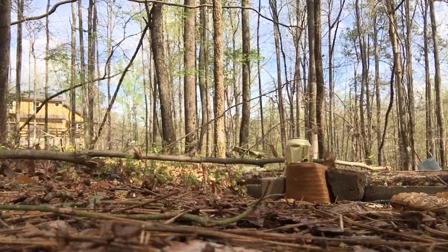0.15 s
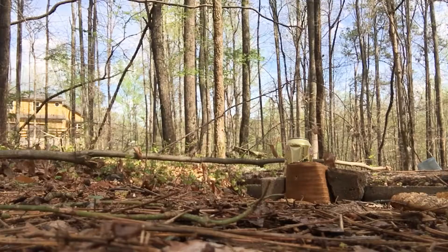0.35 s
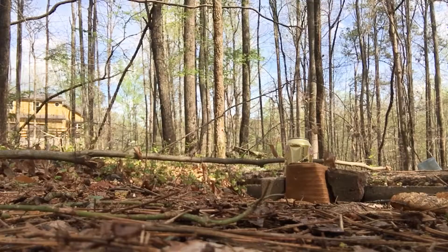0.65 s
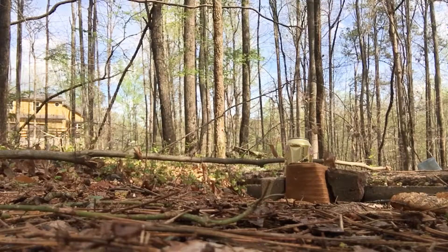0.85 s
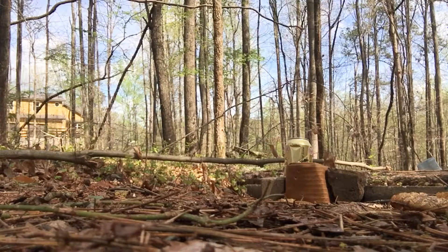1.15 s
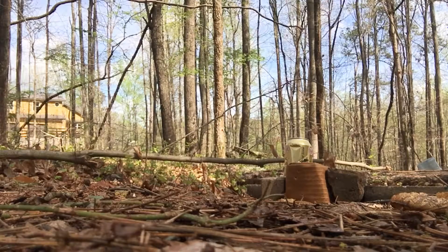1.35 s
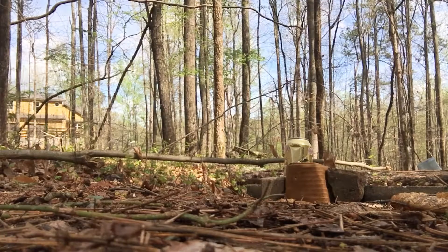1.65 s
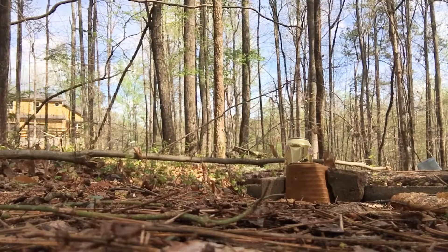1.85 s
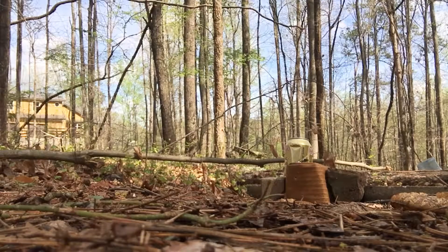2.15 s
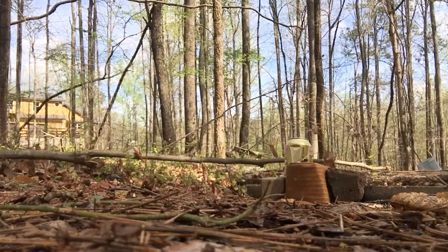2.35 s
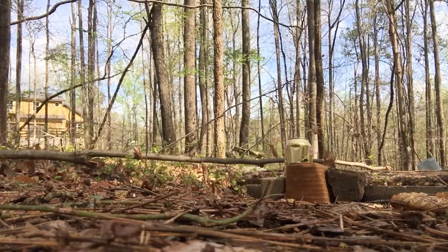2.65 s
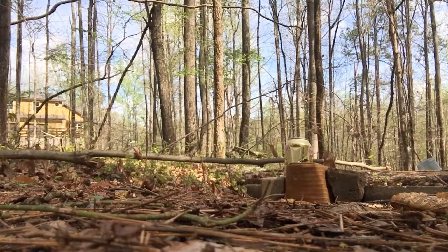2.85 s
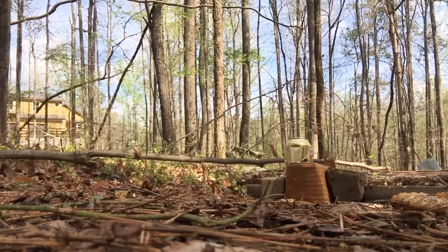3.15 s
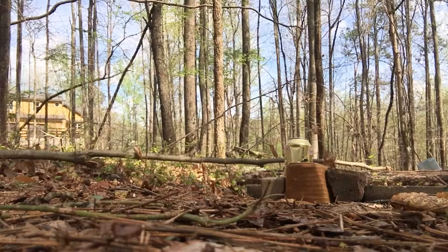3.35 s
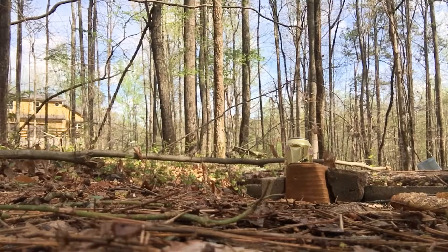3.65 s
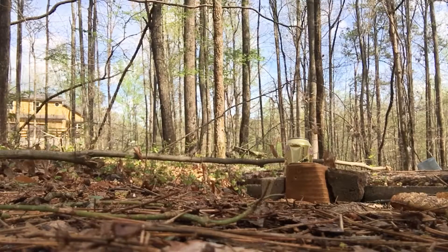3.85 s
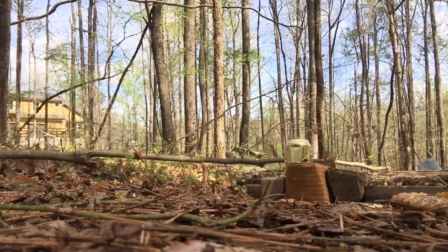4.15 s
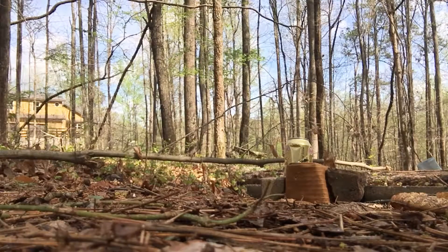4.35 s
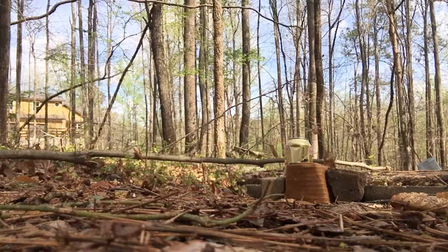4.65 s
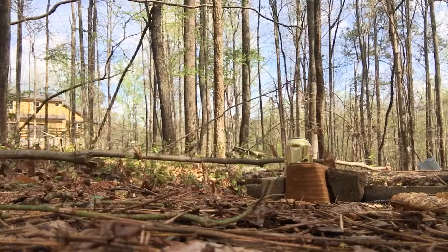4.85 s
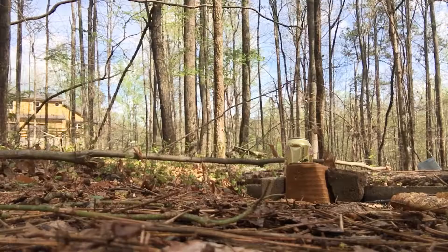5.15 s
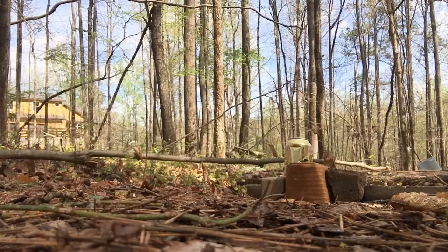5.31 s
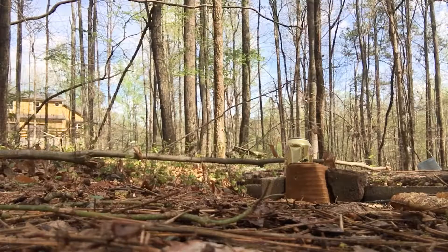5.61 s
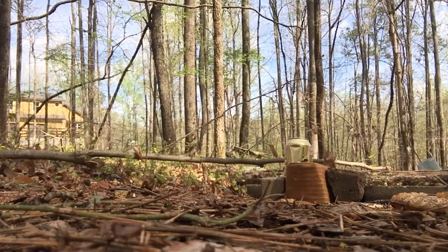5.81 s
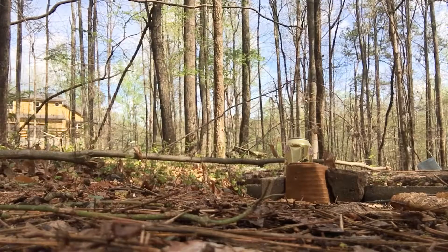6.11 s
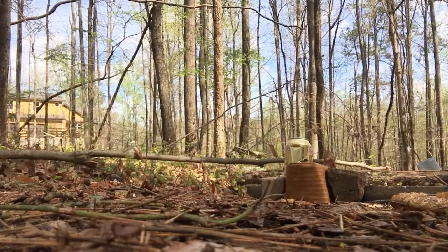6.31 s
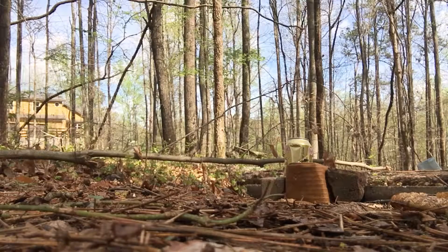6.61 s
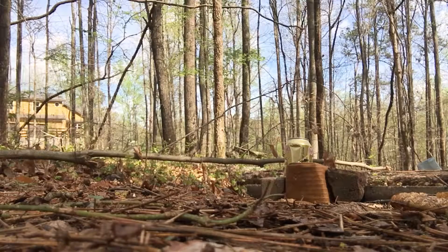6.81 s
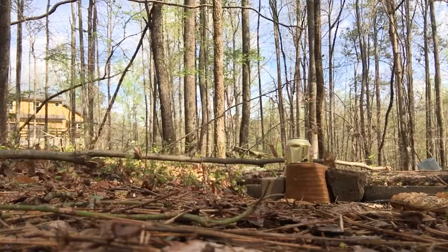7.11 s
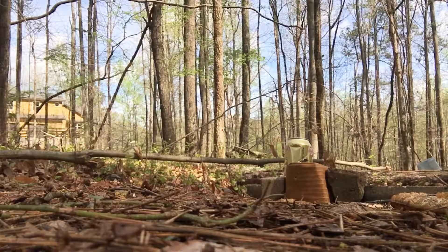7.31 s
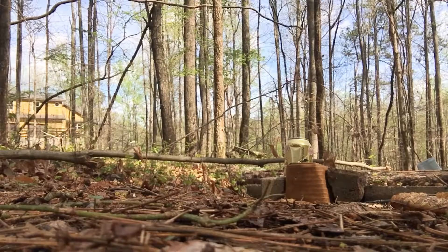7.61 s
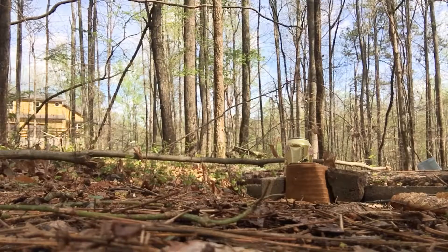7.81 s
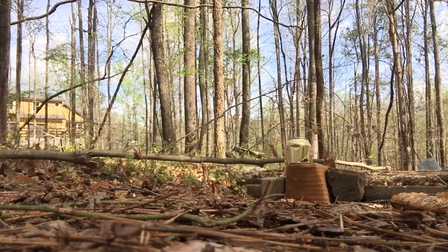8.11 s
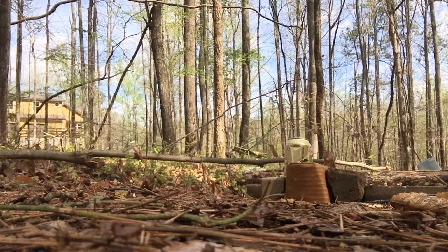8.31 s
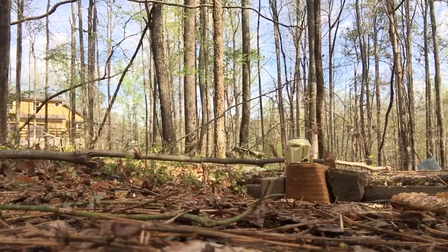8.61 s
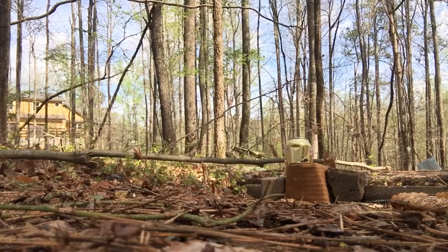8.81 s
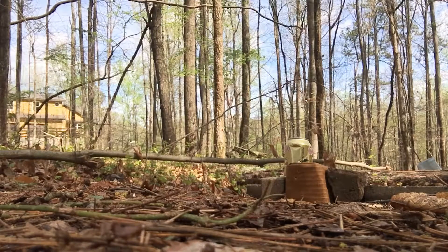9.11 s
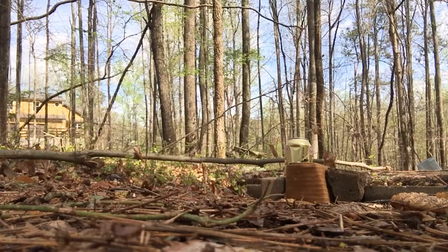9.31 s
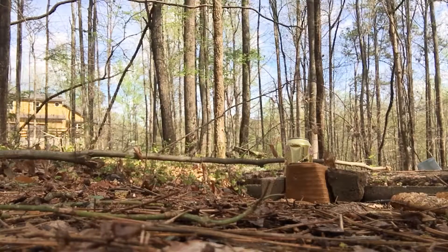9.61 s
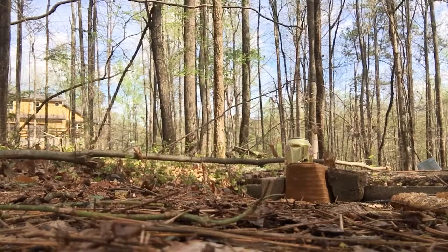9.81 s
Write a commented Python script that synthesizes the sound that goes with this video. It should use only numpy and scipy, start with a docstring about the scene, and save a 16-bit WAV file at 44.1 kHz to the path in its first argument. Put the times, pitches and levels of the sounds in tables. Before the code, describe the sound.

A quiet bare woodland in mono: soft hiss, a blurred far bird chorus and a slow low rumble throughout. At about 0.3 s an air pistol fires one loud crack, a rattle of bright metallic snaps within some 50 milliseconds, with escaping air, a deep short thump and a pellet slap on a pot. Tree trunks return it as scattered noise, a second wave arriving near 0.54 s, darkening and dying over about a second. Clear bird whistles come at 0.7, 1.0 and 1.25 s; tiny dry ticks at 1.3-1.5 s. Faint pump-lever clicks follow at 3.1, 3.8, 4.3 and 4.6 s, a brighter, stronger pair at 5.2-5.3 s, a dull one at 5.4 s and a faint bright rustle at 5.9 s. Buzzy trills recur near 3.3, 5.2 and 7.6 s, with more whistles at 4.4-5.4 s. Three-note bird phrases stand out at 7.9-8.7 s, then thin hoarse calls; a dull click lands at 9.6 s.

```python
"""Air pistol in bare woodland

An air pistol fires once: a rattle of snaps (ringing metal-like modes), hiss, low pushes of air
(deep fading sines) and the pellet's slap on a pot. Tree trunks throw it back as two waves of
scattered noise. Tiny ticks follow; later the pump lever clicks now and then, with one faint bright
rustle (noise through modes). Around it lie far birds (gliding and swept sines), a blurred chorus
with hiss and a low distant rumble (both coloured noise)."""
import sys
import numpy as np
from scipy import signal
from scipy.io import wavfile
from scipy.ndimage import uniform_filter1d

SR = 44100
rng = np.random.default_rng(int(sys.argv[2]) if len(sys.argv) > 2 else 0)


def to_wav(sig):
    """Store sig (one row per channel, or 1-D mono) as 16-bit WAV at the path in sys.argv[1].

    Samples outside -1..1 are clipped; the rate is SR.
    """
    pcm = np.clip(np.atleast_2d(sig), -1, 1) * 32767
    pcm = np.round(pcm).astype(np.int16)
    wavfile.write(sys.argv[1], SR, pcm.T)  # frames by channels


def voltage_ratio(level):
    """Linear amplitude factor for a level in decibels (scalar or array-like)."""
    return 10 ** (np.asarray(level, float) / 20)


N = 439236


def evened(x):
    """Scales a sound to an rms (average strength) of 1."""
    return x / np.sqrt(np.mean(x ** 2) + 1e-20)


def read(points, hz):
    """Reads a value off a table of (f, value), in straight lines over log frequency."""
    f, value = np.transpose(points)
    return np.interp(np.log(hz + 1), np.log(f + 1), value)


def add(mix, s, sound):
    """Mixes a sound in at s seconds; what lies before zero is cut."""
    at = round(s * SR)
    sound = sound[max(-at, 0):]
    part = mix[max(at, 0):][:len(sound)]
    part += sound[:len(part)]


def ring(hz, t60, phase=0):
    """One mode: a sine that fades by 60 dB in t60 seconds, as a struck object does."""
    t = np.arange(round(abs(t60) * SR) + 2) / SR
    return voltage_ratio(-60 * t / t60) * np.sin(2 * np.pi * hz * t + phase)


def shaped(x, gain_db, size):
    """Colours x by gain_db(hz, t), one short slice of its spectrum after another."""
    overlap = size * 3 // 4
    hz, t, z = signal.stft(x, SR, nperseg=size, noverlap=overlap)
    z = z * voltage_ratio(gain_db(hz[:, None], t))
    return signal.istft(z, SR, nperseg=size, noverlap=overlap)[1][:len(x)]


def drift(count, order):
    """Slow random wandering of rms 1, smooth over about order steps."""
    once = uniform_filter1d(rng.standard_normal(count), order)
    return evened(uniform_filter1d(once, order))


def tail(x, t60):
    """Diffuse echo: x smeared by fading noise of total energy 1, cut after a second."""
    taps = rng.standard_normal(SR) * voltage_ratio(-60 * np.arange(SR) / SR / t60)
    return signal.fftconvolve(x, taps / np.linalg.norm(taps))[:N]


def blur(x, t60):
    """Three differently scattered echoes fade in and out in turn, so the tail stays even."""
    turns_per_s = 6
    phase = 2 * np.pi * (np.arange(N) / SR * turns_per_s + np.arange(3)[:, None] / 3)
    weights = np.sqrt(2 / 3) * np.cos(phase / 2)
    return sum(tail(x * weight, t60) for weight in weights)


def tone(hz, db, wander_hz=12):
    """A slightly unsteady sine on a pitch curve, with 10 ms soft ends; db is its rms level."""
    hz = hz + wander_hz * drift(len(hz), order=250)
    wave = np.sqrt(2) * np.sin(2 * np.pi * np.cumsum(hz) / SR)
    return voltage_ratio(db) * wave * signal.windows.tukey(len(hz), 880 / len(hz))


# colour of the far chorus and the microphone hiss: f/Hz, relative level/dB per Hz
AIR_COLOUR = [(150, -30), (250, -2.5), (282, -5.5), (673, -10), (1700, -16), (2610, -16.5), (3400, -18),
              (3960, -21), (6670, -28), (7800, -32), (15900, -41.5)]


def air(patchy_db=1.5):
    """Far blurred chorus, patchy in the bird range, over smooth hiss: coloured noise."""
    level_db = -69

    def field(hz, t):
        patches = rng.standard_normal((len(t), len(hz))).T
        patches = uniform_filter1d(patches, size=8, axis=0)
        patches = evened(uniform_filter1d(patches, size=40, axis=1))
        bird_range = np.exp(-np.log((hz + 1) / 3500) ** 2)
        return read(AIR_COLOUR, hz) + patchy_db * patches * bird_range
    return voltage_ratio(level_db) * evened(shaped(rng.standard_normal(N), field, size=1024))


# colour of the rumble: f/Hz, relative level/dB per Hz
RUMBLE_COLOUR = [(20, -14.5), (30, -6.5), (44, -5.5), (65, 4.5), (85, -3), (110, 2.5), (170, -10.5),
                 (200, -14), (305, -21.5), (420, -29.5), (600, -62.5)]
# how the rumble swells and brightens: t/s, level/dB, tilt/dB per octave around 100 Hz
RUMBLE_LEVEL = [(0, -54.5, 0), (1.6, -55.5, 0.5), (3, -54, -2), (4.1, -55.5, 0.5), (4.8, -54.5, 0.5),
                (6.2, -54.5, 0.5), (7, -55, 0), (7.8, -54, 2.5), (8.7, -55, 0.5), (9.96, -57, -0.5)]


def rumble():
    """Low distant drone: deep noise that swells and brightens slowly."""
    s, db, tilt = np.transpose(RUMBLE_LEVEL)

    def colour(hz, t):
        octaves = np.log2(np.clip(hz, 30, 400) / 100)
        return read(RUMBLE_COLOUR, hz) + np.interp(t, s, tilt) * octaves
    low = shaped(rng.standard_normal(N), colour, size=4096)
    return evened(low) * voltage_ratio(np.interp(np.arange(N) / SR, s, db))


def chorus():
    """Many far birds: short random glides between about 1.8 and 7 kHz, the higher ones fainter."""
    notes_per_s, base_db = 20, -93
    out = np.zeros(N)
    for when, high, glide, length, loud in rng.random((round(notes_per_s * N / SR), 5)):
        first_hz = 1800 * 3.9 ** (high ** 1.9)
        last_hz = first_hz * (1.04 - 0.05 * glide ** 2)
        hz = np.geomspace(first_hz, last_hz, round((0.033 + 0.081 * length) * SR))
        add(out, when * N / SR, tone(hz, base_db + 8 * loud - 14 * high))
    return out


def chatter():
    """A far flock: short, mostly falling notes around one pitch."""
    notes_per_s, base_db = 14, -88
    centre_hz, spread_hz = 2620, 220
    out = np.zeros(N)
    for when, high, glide, length, loud in rng.random((round(notes_per_s * N / SR), 5)):
        first_hz = centre_hz + spread_hz * (2 * high - 1)
        last_hz = first_hz * (1.03 - .1 * glide)
        hz = np.geomspace(first_hz, last_hz, round((0.018 + 0.081 * length) * SR))
        add(out, when * N / SR, tone(hz, base_db + 8 * loud, wander_hz=30.2))
    return out


def trill(hz, swing_hz, db, uneven=0.37):
    """A tone swept up and down too fast to follow; depth and top differ from sweep to sweep."""
    sweeps_per_s = 120
    low_db = -4  # the bottom of each sweep is fainter
    count = len(db)
    turns = np.cumsum(sweeps_per_s * (1 + .3 * drift(count, order=200))) / SR
    top_hz = hz + swing_hz * (1 + uneven * drift(count, order=150))
    low_hz = hz - swing_hz * (1 + .15 * drift(count, order=150))
    sweep = .5 + .5 * signal.sawtooth(2 * np.pi * turns, .5)
    level_db = db + low_db * (1 - sweep) + 1.4 * drift(count, order=900)
    return tone(low_hz + (top_hz - low_hz) * sweep, level_db)


# a buzzy song rises, holds and widens: delay t/s, centre f/Hz, swing f/Hz either way, level/dB
BUZZ = [(0, 3896, 120.1, -10), (.085, 4413, 468.5, 3), (.3, 4382, 479.7, -1.5), (.42, 4250, 600, -3),
        (.6, 3792, 702, -6)]
# when the buzzy song is sung: t/s, level/dB added, shift f/Hz
BUZZ_AT = [(-.2, -70.5, -2), (3.27, -69, -39.5), (5.22, -70, 161.5), (7.619, -71, 172)]
# its second, upper voice: delay t/s, length t/s, centre f/Hz, swing f/Hz either way, level/dB added
BUZZ_UPPER = (0.38, 0.3, 5349.5, 480, -7.5)
# blurred far trills: start t/s, length t/s, centre f/Hz, swing f/Hz either way, top level/dB
MURMURS = [(-.2, 0.62, 2890, 494, -67), (4.469, 0.39, 3010, 301, -69.5), (5.494, 1.2, 2141, 298.5, -76),
           (7.897, 2.05, 2690, 424, -66.5), (8.198, 0.37, 4330, 752, -79), (8.702, 1.23, 4200, 604, -75.5)]
# a thin hoarse call that repeats: t/s, top level/dB
RASP_AT = [(8.16, -80), (8.56, -77), (8.95, -78), (9.36, -77)]


def trills():
    """Buzzy songs, and murmurs and hoarse calls that swell and fade, all as fast trills."""
    out = np.zeros(N)
    delay, *columns = np.transpose(BUZZ)
    t = np.arange(0, delay[-1], 1 / SR)
    hz, swing_hz, shape_db = (np.interp(t, delay, column) for column in columns)
    for s, db, shift_hz in BUZZ_AT:
        add(out, s, trill(hz + shift_hz, swing_hz, db + shape_db, uneven=0.032))
    upper_delay, *upper, upper_db = BUZZ_UPPER
    uppers = [(s + upper_delay, *upper, db + upper_db) for s, db, _ in BUZZ_AT]
    rasp_s, rasp_hz, rasp_swing_hz = 0.2, 5200, 190
    rasps = [(s, rasp_s, rasp_hz, rasp_swing_hz, db) for s, db in RASP_AT]
    for s, length, hz, swing_hz, db in MURMURS + uppers + rasps:
        share = np.arange(0, 1, 1 / SR / length)  # share of the length gone by
        swell_db = np.interp(share, [0, .35, 1], [-8.5, 0, -10])
        add(out, s, trill(hz, swing_hz, db + swell_db))
    return out


def birds():
    """All birds, blurred by the wood; the trills arrive mostly as echo, clear notes carry less."""
    echo_t60 = 1  # seconds
    notes = chorus() + chatter() + whistles() + chirps()
    fast = trills()
    fast = 0.45 * fast + blur(fast, 0.077)
    return notes + fast + voltage_ratio(-6) * tail(notes, echo_t60) + voltage_ratio(-1.5) * blur(fast, echo_t60)


# what the pistol rings with: f/Hz, level/dB, t60 t/s
PISTOL = [(1800, -3, 0.0076), (2300, -4.5, 0.0053), (2950, 1, 0.0034), (5990, -2, 0.0031),
          (6800, -3, 0.0021)]
# the struck pot: f/Hz, level/dB, t60 t/s
POT = [(1053, -13, 0.025), (1370, -11.5, .016)]
# snaps of trigger, hammer, valve and pellet:
# t/s, level/dB, level/dB added to the lower modes, level/dB added to the upper modes
SNAPS = [(0.2888, -37, -15, -17.5), (.3095, 1, -15, -18), (0.3136, -3.5, -0.5, 1), (0.318, -12, 4, -8.5),
         (.3218, -12, -12, -11), (0.326, -16.5, -10.5, -11), (0.331, -17, -11.5, -5.5),
         (0.3332, -8, -8.5, -5), (0.3354, -5.5, -1, 3)]


def snaps():
    """Each snap rings the pistol's modes and starts with a bright crackle; the pellet rings the pot."""
    middle_hz = 3050  # the mode near here always speaks
    edge_db, edge_follows = -14, 0.3  # the crackle follows the upper modes in part
    pot_s, pot_rise_s = .3378, 0.0029
    out = np.zeros(N)
    edges = np.diff(rng.standard_normal((len(SNAPS), 200))) * voltage_ratio(-np.arange(199) * .4)
    for (s, db, low_db, high_db), edge in zip(SNAPS, edges):
        for hz, mode_db, t60 in PISTOL:
            snap = ring(hz, t60)
            snap[:8] *= np.arange(8) / 8  # a slightly soft start
            side_db = low_db * (hz < .9 * middle_hz) + high_db * (hz > 1.1 * middle_hz)
            add(out, s, -voltage_ratio(db + mode_db + side_db) * snap)
        add(out, s, voltage_ratio(db + edge_db + edge_follows * high_db) * edge)
    for hz, db, t60 in POT:
        note = ring(hz, t60)
        rise = np.minimum(np.arange(len(note)) / SR / pot_rise_s, 1)
        add(out, pot_s, -voltage_ratio(db) * note * rise)
    return out


# colour of the rushing air: f/Hz, relative level/dB per Hz
RUSH_COLOUR = [(780, -25.5), (1200, -5), (2500, -2.5), (4400, -5.5), (5500, -10.5), (8000, -17.5),
               (10000, -24), (13000, -22), (15800, -26)]


def rush():
    """Escaping air as noise: a leak grows up to the loudest snap, and each snap after the first puffs."""
    puff_db, puff_rise_s, puff_t60 = -15, 0.0036, 0.05  # dB against its snap
    leak_db, leak_db_per_s = -43.5, 1099.5
    band_hz, band_width_hz, band_db, band_db_per_s = 5800, 700, -37, 1500
    loudest_s = SNAPS[1][0]
    t = np.arange(SNAPS[0][0], SNAPS[-1][0] + puff_t60, 1 / SR)
    power = voltage_ratio(leak_db - leak_db_per_s * abs(t - loudest_s)) ** 2
    for s, db, *_ in SNAPS[1:]:
        u = np.maximum(t - s, 0)
        puff = np.minimum(u / puff_rise_s, 1) * voltage_ratio(db + puff_db - 60 * u / puff_t60)
        power = power + puff ** 2
    hiss = shaped(rng.standard_normal(len(t)), lambda hz, _: read(RUSH_COLOUR, hz), size=256)
    out = np.zeros(N)
    add(out, t[0], evened(hiss) * np.sqrt(power))

    # the leak also hisses in one narrow band
    def narrow(hz, _):
        return -6 * np.minimum(((hz - band_hz) / band_width_hz) ** 2, 10)
    band = shaped(rng.standard_normal(len(t)), narrow, size=128)
    before = loudest_s - t
    add(out, t[0], evened(band) * voltage_ratio(band_db - band_db_per_s * before) * (before > 0))
    return out


# low pushes of air: t/s, level/dB, f/Hz, t60 t/s
PUSHES = [(0.3117, -12, 128.4, 0.049), (0.312, -16.5, 267.7, 0.036), (0.337, -18.5, 110.4, 0.052),
          (0.338, -19.5, 479, 0.0072)]


def pushes():
    """Released air pushes as deep, quickly fading sines that start with a step of pressure."""
    out = np.zeros(N)
    for s, db, hz, t60 in PUSHES:
        add(out, s, voltage_ratio(db) * ring(hz, t60, 1.0))
    return out


# scattered returns from near trunks and the farther tree line: t/s, level/dB, spread t/s
WAVES = [(.34, -38, 0.076), (0.538, -41.5, 0.083)]
# colour of the scattered return: f/Hz, relative level/dB per Hz
WOOD_COLOUR = [(200, -21.5), (500, -11.5), (1000, -4), (2000, -0.5), (3300, -1.5), (4500, -7), (6000, -4.5),
               (8000, -13.5), (10000, -19), (15500, -21)]
# extra loss that grows with time: f/Hz, loss level/dB per second
WOOD_LOSS = [(300, 13.5), (1000, 2), (3000, 6.5), (6000, 20.5), (10000, 37), (16000, 52.5)]


def wood():
    """Countless trunks scatter the crack in two waves of noise; longer paths lose more treble."""
    length_s, rise_s, db_per_decade, db_per_s = 1.4, 0.0055, 16.5, 10.5
    t = WAVES[0][0] + np.arange(0, length_s, 1 / SR)
    power = 0
    for s, db, spread_s in WAVES:
        u = np.maximum(t - s, 0)
        fall_db = db_per_decade * np.log10(1 + u / spread_s) + db_per_s * u
        power = power + (np.minimum(u / rise_s, 1) * voltage_ratio(db - fall_db)) ** 2
    # even noise, with about 2500 stronger taps a second
    taps = rng.standard_normal(len(t)) * (0.25 + (rng.random(len(t)) < 2500 / SR))
    taps = shaped(taps, lambda hz, _: read(WOOD_COLOUR, hz), size=256)
    taps = evened(taps) * np.sqrt(power)
    out = np.zeros(N)
    add(out, t[0], shaped(taps, lambda hz, u: -read(WOOD_LOSS, hz) * u, size=256))
    return out


# echoes from single trunks and a far wall: delay t/s, level/dB
SLAPS = [(0.0514, -16.5), (0.075, -31), (.096, -30), (.147, -33), (0.194, -33), (0.234, -38)]


def slaps(crack):
    """Single trunks and a far wall return thin copies of the crack, with less bass and treble."""
    out = np.zeros(N)
    thin = signal.lfilter(*signal.butter(2, [1400, 7000], "band", fs=SR), crack[:SR // 2])
    for delay, db in SLAPS:
        add(out, delay, voltage_ratio(db) * thin)
    return out


def shot():
    """Crack, low pushes, slaps from single trunks and a far wall, and the scattered return."""
    crack = snaps() + rush()
    return crack + pushes() + wood() + slaps(crack)


def whistle(length, first_hz, held_hz, db, share):
    """Slides onto its pitch, swells, sags and lingers faintly."""
    settle_s, swell_db, fade_db_per_s = 0.038, -7.5, 27
    linger_s, linger_db = .36, -12.5  # a faint rest of the note hangs on
    t = np.arange(0, length + linger_s, 1 / SR)
    top = share * length
    level_db = db + swell_db * np.maximum(1 - t / top, 0) ** 2
    level_db -= fade_db_per_s * np.maximum(t - top, 0)
    rest = np.clip((t - length) / 0.036, 0, 1)
    level_db += rest * (linger_db + 5.1 * drift(len(t), order=1500))
    hz = held_hz + (first_hz - held_hz) * np.exp(-t / settle_s)
    return tone(hz, level_db + 2.5 * drift(len(t), order=500))


# held whistles: t/s, length t/s, first f/Hz, held f/Hz, top level/dB,
# share of the length at which it is loudest
WHISTLES = [(0.688, 0.18, 3890, 3870, -63.5, .85), (0.984, 0.2, 6060, 5860, -66, 0.91),
            (1.247, .22, 3450, 3570, -69.5, 0.43), (4.387, 0.37, 6170, 5830, -70, 0.59),
            (4.772, 0.22, 3800, 3865, -64, .7), (5.092, 0.19, 6310, 5930, -69.5, 1),
            (5.35, 0.4, 3440, 3540, -73, 0.29), (9.544, 0.39, 6430, 6330, -81.5, 0.46)]


def whistles():
    """Single birds hold clear whistled notes."""
    out = np.zeros(N)
    for s, *note in WHISTLES:
        add(out, s, whistle(*note))
    return out


# tiny ticks soon after the shot: t/s
TICKS = [1.326, 1.3412, 1.3715, 1.3946, 1.419, 1.469, 1.508]


def ticks():
    """Tiny dry ticks, perhaps the grip creaking: one very short high mode each."""
    out = np.zeros(N)
    for s in TICKS:
        add(out, s, voltage_ratio(-58) * ring(hz=6800, t60=0.0015))
    return out


def chirp(length, first_hz, last_hz, db):
    """One glide from pitch to pitch; longer notes come and go more."""
    count = round(length * SR)
    broken_db = (1.5 + 3 * length) * drift(count, order=700)
    hz = np.geomspace(first_hz, last_hz, count)
    return tone(hz, db + broken_db, wander_hz=28 + 30 * length)


# single chirps and faint steady notes: t/s, length t/s, first f/Hz, last f/Hz, level/dB
CHIRPS = [(2.1, 0.054, 2420, 2300, -82.5), (2.21, 0.05, 2050, 2050, -82.5), (2.379, 0.044, 5000, 4200, -78),
          (2.455, 0.021, 4265, 4147, -76), (3.7, 0.14, 3550, 2850, -80), (3.86, .12, 2950, 2683, -79),
          (4.15, 0.33, 2740, 2860, -87), (4.49, 0.097, 3500, 2950, -78), (4.785, 0.028, 4350, 3954, -69),
          (4.93, 0.072, 3250, 2420, -77), (5.047, 0.054, 4130, 3390, -70), (5.34, 0.29, 5090, 4960, -79),
          (5.53, .17, 2296, 2007, -76.5), (5.975, 0.082, 3000, 2100, -77), (5.97, 0.12, 6960, 7110, -85.5),
          (6.35, .26, 3470, 3410, -80.5), (6.62, 0.29, 3590, 3505, -81), (6.28, 0.076, 1936, 2203, -74),
          (6.388, 0.053, 1893, 1685, -74), (6.468, 0.058, 1947, 2174, -75),
          (6.71, 0.077, 1940, 1730, -72.5), (7.09, 0.041, 2900, 2420, -78),
          (7.125, 0.18, 2420, 2390, -80.5), (7.198, 0.05, 1815, 1773, -73),
          (7.585, 0.042, 2433, 2420, -72.5), (7.69, 0.046, 1800, 1797, -77), (7.7, .17, 2850, 2880, -76.5),
          (8.7, .3, 2820, 2775, -69)]
# a far bird drops to a held note: delay t/s, length t/s, first f/Hz, last f/Hz, level/dB
DROP = [(0, .045, 2980, 2550, 1.5), (.045, .33, 2602, 2626, -10)]
# when the drop is sung: t/s, level/dB added
DROPS = [(5.487, -72.5), (5.86, -71), (6.239, -73), (6.59, -70.5)]
# a phrase of three notes: delay t/s, length t/s, first f/Hz, last f/Hz, level/dB
PHRASE = [(0, 0.043, 2775, 2345, 0), (.06, .16, 2875, 2785, -6), (.22, .1, 2770, 2716, 1)]
# when the phrase is sung: t/s, level/dB added
PHRASES = [(7.886, -61.5), (8.2, -58), (8.495, -64.5)]


def chirps():
    """Single chirps, drops and phrases, each note a gliding sine."""
    out = np.zeros(N)
    for song, times in (CHIRPS, [(0, 0)]), (DROP, DROPS), (PHRASE, PHRASES):
        for s, db in times:
            for delay, *glide, note_db in song:
                add(out, s + delay, chirp(*glide, db + note_db))
    return out


# what the pump lever rings with; the rustle uses it too: f/Hz, level/dB, t60 t/s
LEVER_MODES = [(1530, -46, 0.017), (2129, -1, 0.016), (2950, -6, 0.014), (3710, 9.5, 0.0036),
               (4200, 1.5, 0.011), (5460, 2, 0.0026), (7500, -4.5, 0.0012), (11700, -11, 0.0015)]
# lever clicks, and one faint bright rustle at 5.868:
# t/s, rms level/dB of the first 7 ms, brightness level/dB at 8000 Hz
CLICKS_AND_RUSTLE = [(3.106, -66.5, -36), (3.7626, -60, -6), (4.2673, -65.5, -2), (4.6347, -67.5, -15),
                     (5.1962, -53.5, 20), (5.284, -52, 24), (5.4415, -62, -34), (5.868, -69, 26),
                     (9.5792, -54, -40)]
# echo from a near surface: delay t/s, level/dB
NEAR_ECHO = (0.026, -11.5)


def lever_and_rustle():
    """Short scrapes of noise excite the lever's modes; a near surface and the trunks echo them."""
    count = len(CLICKS_AND_RUSTLE)
    out = np.zeros(N)
    scrapes = rng.standard_normal((count, 900)) * voltage_ratio(-np.arange(900) * 0.042)
    spread_db = 2 * rng.standard_normal((count, len(LEVER_MODES)))  # no two ring alike
    echo_s, echo_db = NEAR_ECHO
    for (s, db, bright_db), scrape, spread in zip(CLICKS_AND_RUSTLE, scrapes, spread_db):
        body = np.zeros(3000)
        for (hz, mode_db, t60), extra_db in zip(LEVER_MODES, spread):
            tilt_db = bright_db * min(hz / 8000, 1) ** 0.95
            add(body, 0, voltage_ratio(mode_db + extra_db + tilt_db) * ring(hz, t60))
        sound = signal.fftconvolve(scrape, body)
        sound *= voltage_ratio(db) / np.sqrt(np.mean(sound[:300] ** 2))
        add(out, s, sound)
        add(out, s + echo_s, voltage_ratio(echo_db) * sound)
    return out + voltage_ratio(-1.5) * tail(out, t60=0.67)


def scene():
    """All sources at one microphone."""
    return (air() + rumble() + birds() + shot() + ticks() + lever_and_rustle())[None]


def top_cut(x):
    """Nothing passes above the cut-off."""
    return signal.sosfilt(signal.butter(12, 16460, fs=SR, output="sos"), x)


def record(dry):
    """The microphone drops the deepest bass and squeezes the crack's peaks; then the top is cut off."""
    bass_cut_hz, top_hz = 48, 15900
    dry = signal.lfilter(*signal.butter(2, bass_cut_hz, "high", fs=SR), dry)
    squeezed = .9 * np.tanh(dry / .9)
    edge = signal.firwin(255, top_hz, window=("kaiser", 9), fs=SR)
    mix = signal.oaconvolve(squeezed, edge[None], "same")
    return top_cut(mix)


dry = scene()
out = record(dry)
to_wav(out)
```